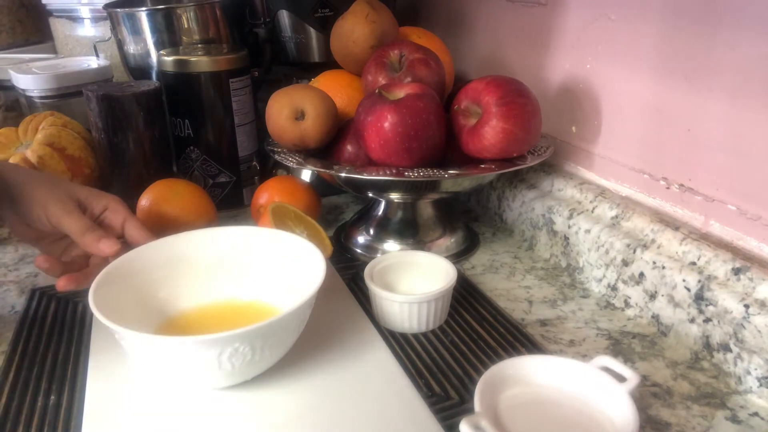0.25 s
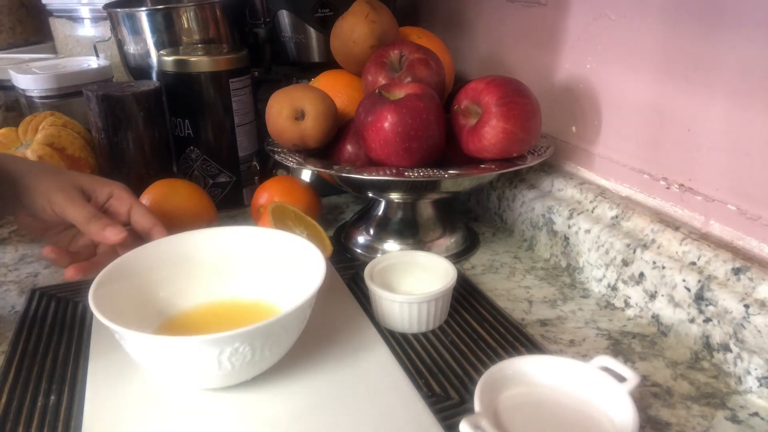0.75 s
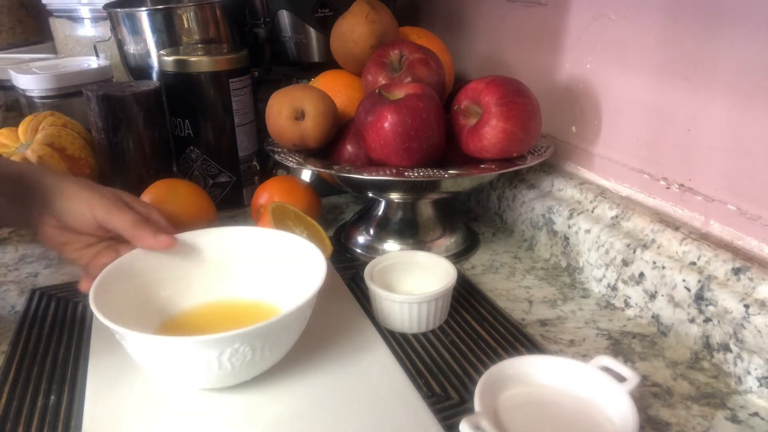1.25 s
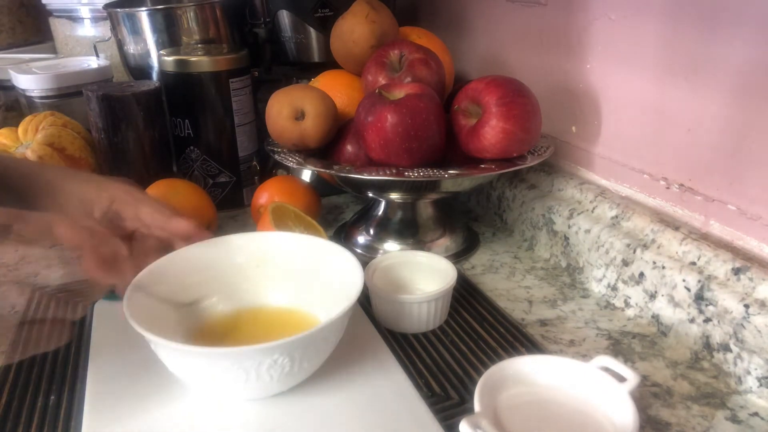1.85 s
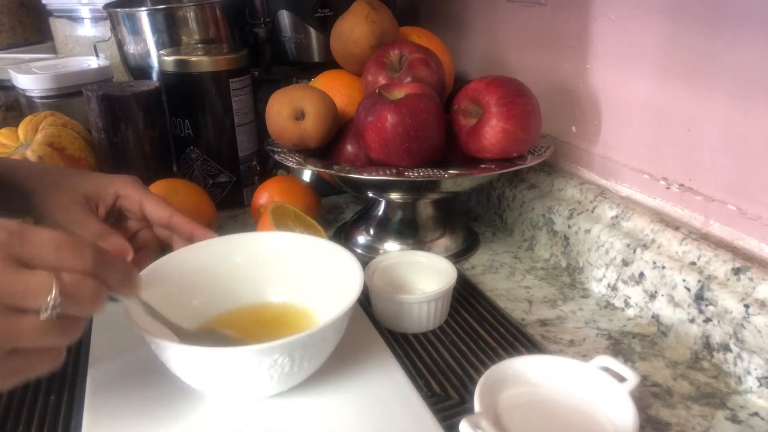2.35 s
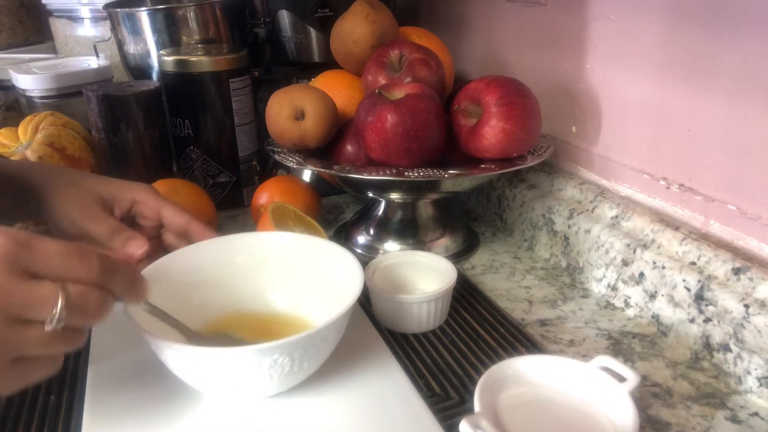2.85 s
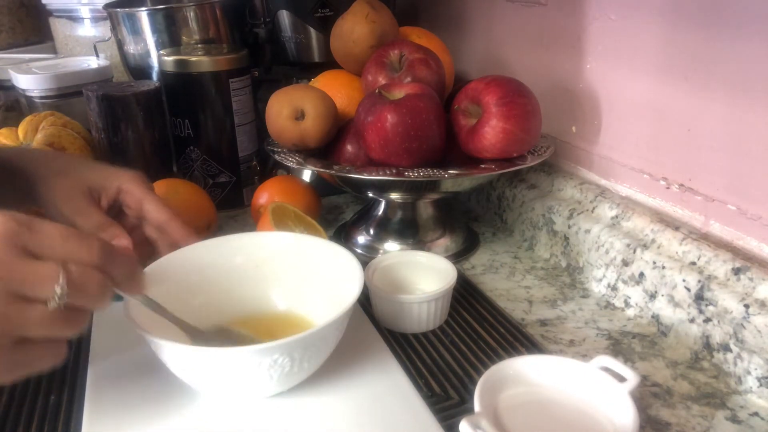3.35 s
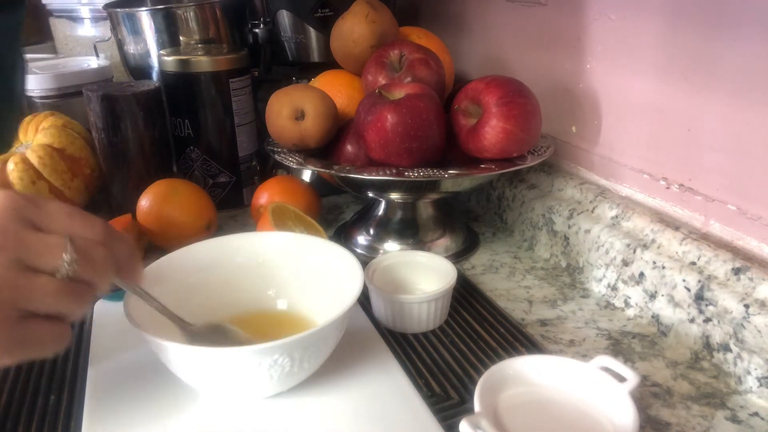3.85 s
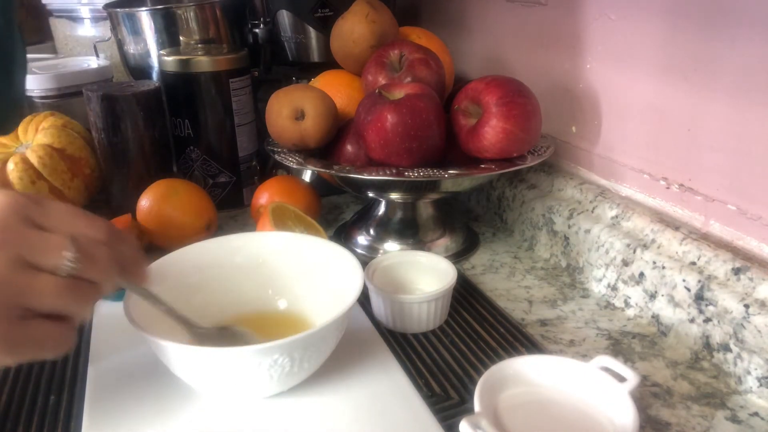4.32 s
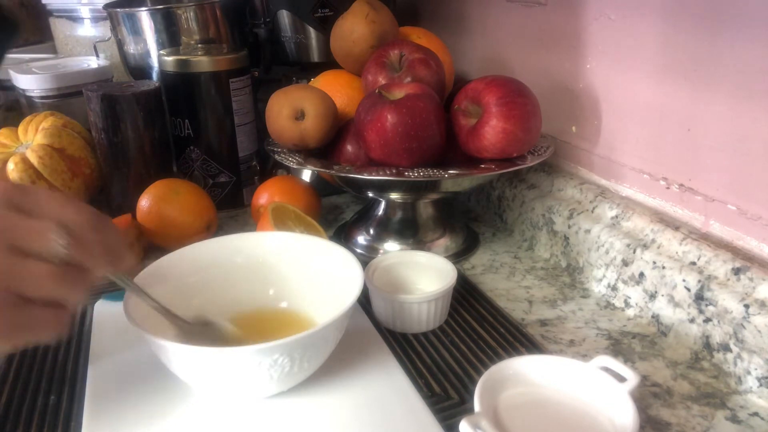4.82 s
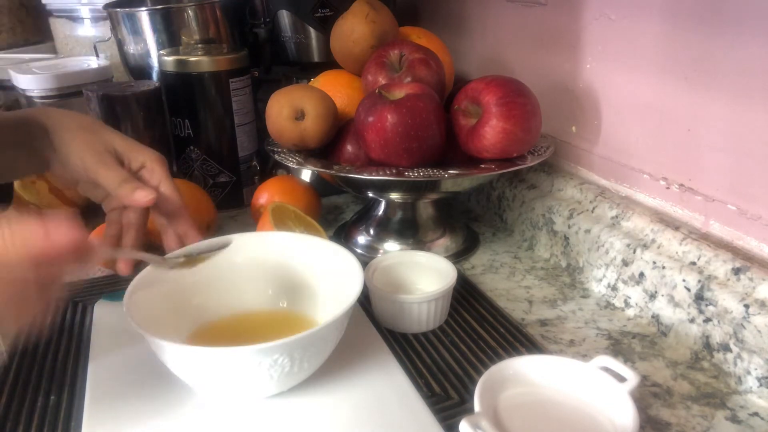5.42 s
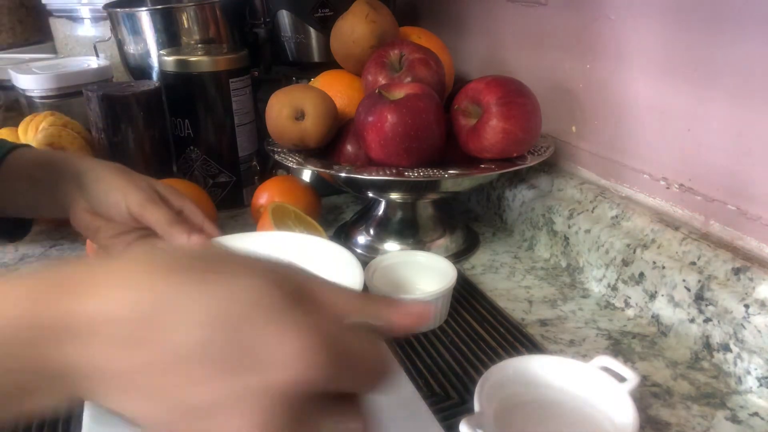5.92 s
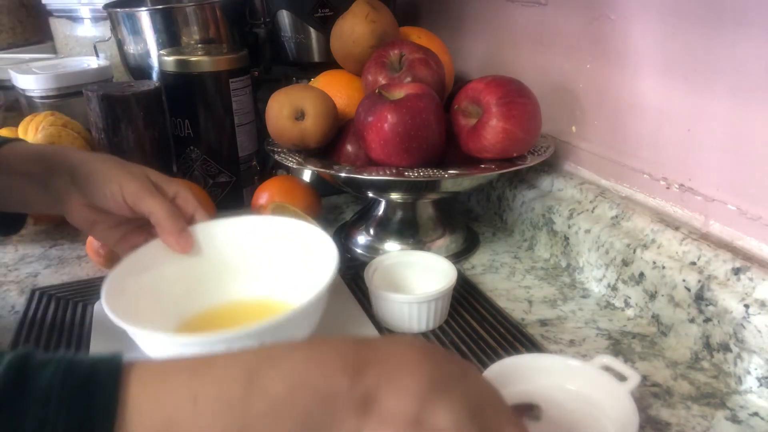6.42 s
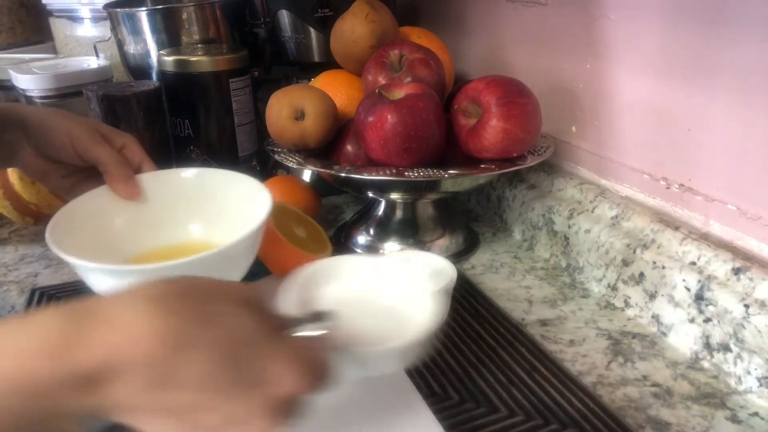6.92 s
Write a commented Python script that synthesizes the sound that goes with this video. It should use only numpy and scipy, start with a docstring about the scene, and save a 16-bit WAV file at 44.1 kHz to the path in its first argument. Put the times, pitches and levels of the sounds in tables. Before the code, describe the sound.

A cutlery drawer opens with a few knocks and shuts with a loud bang, farther back in a kitchen. Nearer the microphone and quieter, a ceramic bowl is pushed across a board, and a metal spoon lands in it with a ringing clink. Brisk stirring follows for about three seconds, the scrape rising and falling in pitch over softly swishing liquid. Light rubs and ticks of handled dishes end it, over faint room rumble and hiss.

```python
"""A kitchen counter, microphone close to the bowl. Farther off a drawer knocks open, rolls and bangs shut,
jolting the cutlery. A ceramic bowl is slid over a board. A steel spoon clinks into it and scrapes round
through a little juice, its resonances gliding as the contact moves. Then dishes are nudged and lifted
with soft rubs and small ticks. Under it all lie a low room rumble, hiss and a thin whine, which dip
as the stirring starts and creep back."""
import sys
import numpy as np
from scipy import signal
from scipy.fft import rfft, irfft, next_fast_len
from scipy.io import wavfile
from scipy.ndimage import map_coordinates

SR = 44100
rng = np.random.default_rng(int(sys.argv[2]) if len(sys.argv) > 2 else 0)


def master(y):
    """Save y as 16-bit WAV."""
    cut = np.clip(np.atleast_2d(y).T, -1, 1)
    pcm = np.round(cut * 32767)  # scale
    wavfile.write(sys.argv[1], SR, pcm.astype(np.int16))


N = 316197
TOP_HZ = 15900  # the microphone's band limit


def stirring():
    """Friction on the glaze drives the spoon's gliding modes and the bowl; each jerk plucks the spoon."""
    # Strokes along the wall. Each row: start and length in seconds, bending, second mode and rasp in dB.
    strokes = [(2.05, .13, -67, -72, -84), (2.32, 0.16, -63, -75, -81), (2.48, 0.12, -58.5, -74, -80),
               (2.65, 0.075, -66, -69, -79), (2.86, 0.098, -58.5, -80, -72.5), (2.99, 0.2, -56, -66, -84),
               (3.19, 0.11, -67, -72, -70), (3.36, 0.12, -57, -60.5, -69.5), (3.52, 0.083, -49, -59.5, -69),
               (3.68, 0.086, -59, -56, -68), (3.85, 0.12, -51.5, -56.5, -64),
               (3.98, 0.062, -51.5, -72, -97), (4.18, 0.1, -66, -58, -74), (4.36, 0.09, -54, -56, -67),
               (4.44, 0.088, -50, -70, -74.5), (4.605, 0.19, -49, -57, -69.5), (4.8, 0.011, -51, -56, -68)]
    # The edge catches and jerks free. Each row: start in seconds, bending and rasp in dB.
    catches = [(2.424, -59, -65), (3.002, -44.5, -76), (3.029, -47, -79), (3.107, -48, -62),
               (3.437, -52, -56), (3.477, -42.5, -76), (3.504, -40, -72), (3.529, -42, -74),
               (3.556, -40, -66), (3.577, -51, -57), (3.704, -40.5, -70), (3.903, -44, -68),
               (3.951, -37.5, -61), (4.059, -41, -82), (4.244, -42.5, -65), (4.364, -46, -57.5),
               (4.424, -37.5, -62), (4.452, -43, -76), (4.576, -41.5, -69), (4.607, -37, -71),
               (4.801, -37.5, -60)]
    # The second mode drifts with the grip. Each row: time in seconds, pitch in Hz.
    grip = [(2.15, 1710), (2.37, 1810), (2.55, 1680), (2.9, 1790), (3.15, 2030), (3.42, 1915), (3.58, 1720),
            (3.92, 1780), (4.28, 1775), (4.6, 1660)]
    attack_s, release_s, brisk_s = 0.022, 0.15, 2.33
    bending, second, rasping = played(strokes, attack_s, release_s)
    jerks, bites = played([(s, 0, *levels) for s, *levels in catches], attack_s=0.0015, release_s=0.068)
    # light contact between strokes, firmer as the stirring gets brisk
    drag = amp(-71 + 6 * (clock() - brisk_s)) * stroke(brisk_s, 2.47, attack_s, release_s)
    pressure = np.sqrt(bending ** 2 + (amp(-10) * jerks) ** 2 + drag ** 2)
    second_hz, = curves(grip)
    friction = grit(grain_db=1.5) * amp(1.2 * wobble(45))
    spoon = pressure * resonate(friction, bending_hz(), width_hz=282, order=4)
    spoon += np.hypot(second, amp(-11) * drag) * resonate(friction, second_hz, width_hz=460, order=4)
    plucks = jerks * sine(bending_hz() + 35 * wobble(120))
    return spoon + plucks + scraped_bowl(friction, pressure) + np.hypot(rasping, bites) * rasp()


def bending_hz():
    """The spoon's bending mode sinks and rises once a turn as the point of contact moves."""
    # The top of each turn, where the mode is highest. Each row: time in seconds, pitch in Hz.
    turns = [(2.2, 1256), (2.72, 1260), (3.62, 1331), (4.2, 1235), (4.68, 1191), (5.0, 1184)]
    low_hz = 1110
    turn, top_hz = curves([(s, k, hz) for k, (s, hz) in enumerate(turns)])
    return low_hz + (top_hz - low_hz) * np.cos(np.pi * turn) ** 2


def scraped_bowl(friction, pressure):
    """The bowl's broad modes follow the pressure; its narrow ones sing on after the scrape."""
    # Each row of both: pitch in Hz, width in Hz, relative level in dB.
    broad_modes = [(490, 55, -22), (727, 42, -13.5)]
    narrow_modes = [(1005, 2.2, -17), (2296, 13, -25)]
    drive = pressure * friction
    singing = np.std(drive) * resonances(drive, narrow_modes)
    return pressure * resonances(friction, broad_modes, order=2) + singing


def rasp():
    """Where the spoon's edge bites, it chatters into the high modes and crunches on the glaze."""
    # Each row: pitch in Hz, half width in Hz, relative level in dB.
    high_modes = [(3090, 170, 3.5), (3260, 55, 2.5), (3550, 20, -1), (4250, 42, 0.5), (5210, 180, 6.5),
                  (8790, 81, -2.5), (9950, 40, -8.5)]
    # Each row: frequency in Hz, spectral level in dB.
    crunch_colour = [(1500, 4), (2300, 4.5), (4000, -15), (8000, -10.5), (15000, -29)]
    chatter = grit(grain_db=3) * amp(2 * wobble(70))
    ringing = unit(resonances(chatter, [(hz, 2 * half, db) for hz, half, db in high_modes], order=2))
    return amp(-1) * ringing + amp(-1.5) * noise(crunch_colour, grain_db=3)


def squeals():
    """The chattering edge excites one high mode of the spoon, which glides in some squeals."""
    # Each row: peak time and half length in seconds, level in dB, pitch in Hz, glide in Hz per second.
    squeaks = [(2.452, 0.03, -74, 6050, 6000), (3.111, 0.0082, -60, 5210, 0),
               (3.434, 0.025, -62.5, 5580, 0), (3.54, 0.008, -65, 6090, 0),
               (3.719, 0.027, -64.5, 5680, 5000), (3.82, .04, -78, 6140, 0),
               (3.93, 0.032, -65, 5480, -4000), (4.24, 0.027, -64.5, 5800, 5000),
               (4.701, 0.039, -60.5, 5810, 0), (4.825, 0.015, -71, 6080, 0)]
    times, _, _, hz, glide = np.transpose(squeaks)
    nearest = np.searchsorted((times[1:] + times[:-1]) / 2, clock())
    pitch_hz = hz[nearest] + glide[nearest] * (clock() - times[nearest])
    slipping = unit(amp(4 * wobble(220)))
    squeal = slipping * resonate(grit(grain_db=6), pitch_hz, width_hz=160, order=2)
    return sum(amp(db) * swell(s, half) for s, half, db, _, _ in squeaks) * squeal


def juice():
    """The liquid swishes round and settles; a slap of the spoon gives a quickly falling plop."""
    # Each row: peak time and half length in seconds, level in dB.
    swirls = [(2.593, 0.32, -69.5), (3.125, 0.14, -67), (3.387, 0.055, -65.5), (3.992, 0.77, -71.5)]
    # Each row: frequency in Hz, spectral level in dB.
    swish_colour = [(300, -6), (2200, 1.5), (3200, -10.5), (6500, -9.5), (15000, -38)]
    # Each row: start in seconds, level in dB.
    slaps = [(2.303, -53.5), (3.445, -32)]
    out = sum(amp(db) * swell(s, half) for s, half, db in swirls) * noise(swish_colour, grain_db=1)
    t = clock()[:SR // 10]
    plop = sine(380 + 1100 * fade(t, t60=0.0063)) * np.exp(-(t / 0.0029) ** 2)
    for s, db in slaps:
        add(out, s, amp(db) * plop)
    return out


def clinks():
    """The spoon strikes the wall and both ring freely; as it lands, the board gives a soft thud."""
    # Each row: start in seconds, level in dB.
    strikes = [(1.879, -49.5), (2.497, -72.5), (4.804, -63)]
    # Bowl and spoon together. Each row: pitch in Hz, relative level in dB, t60 in seconds.
    free_modes = [(738, -6.5, 0.14), (1027, -8, 1.95), (2333, -8.5, 0.21), (4130, -18, 0.3),
                  (5300, -5, 0.08), (5776, -6.5, 0.14), (8500, -7, 0.12)]
    contact_colour = [(300, -7), (1300, 18), (3000, 2.5), (8500, 1), (12000, -23)]
    out, t = np.zeros(N), clock()[:SR]
    for s, db in strikes:
        contact = noise(contact_colour)[:SR] * fade(t, t60=0.06)
        add(out, s, amp(db) * (ring(free_modes, t) + 2.07 * contact))
    thud = ring([(58, -47.5, 0.28), (138, -47, 0.12)], t)
    add(out, 1.98, thud)
    return out


def landing():
    """The spoon clatters on the bottom of the bowl, damped by the juice."""
    # Each row: start in seconds, level in dB.
    contacts = [(1.961, -46), (1.964, -42.5), (1.9716, -42.5)]
    # Each row: frequency in Hz, spectral level in dB.
    clatter_colour = [(120, -35), (200, -5.5), (550, 1.5), (671, -30), (849, -3.5), (2210, -6.5),
                      (3800, -22.5), (5550, -17), (15000, -38)]
    out, t, clatter = np.zeros(N), clock()[:SR // 10], noise(clatter_colour)
    for s, db in contacts:
        add(out, s, amp(db) * burst(clatter, s, t, t60=0.037))
    return out


def drawer():
    """Each blow cracks at the catch, rings front and box and swells in the cabinet; shutting shakes
    the frame hardest."""
    # Each row: start in seconds, then cabinet, front, frame, box, clack and crack in dB.
    blows = [(.403, -27, -29, -49, -53, -45.5, -31.5), (0.43, -46, -36, -71, -52, -52, -37.5),
             (.441, -29.5, -35, -50, -48, -53, -36.5), (0.9388, -30, -36.5, -27.5, -50.5, -18.5, -27.5),
             (1.0211, -21, -22, -19, -30.5, -46, -38.5)]
    # Cabinet, drawer front, the frame that stops it, hollow box and steel catch.
    # Each row: pitch in Hz, relative level in dB, t60 in seconds.
    cabinet_modes = [(128.4, -8.5, .32), (154.7, -2, 0.18)]
    front_modes = [(356, -3, 0.033), (555, -3.5, 0.042), (578, 0.5, 0.06), (837, -4, 0.085),
                   (1660, -7, 0.06), (1726, -7.5, 0.044), (2380, -20.5, 0.16)]
    frame_modes = [(245, -2.5, 0.12), (293, -11, 0.069), (445, -3, 0.057), (1003, -1.5, 0.036),
                   (1126, -2.5, 0.026), (1285, -3.5, 0.022), (1800, -9, 0.045)]
    box_modes = [(368, -5, .09), (523, -1.5, 0.1), (561, -3.5, 0.089), (609, 2, 0.16)]
    latch_modes = [(1655, -10.5, 0.056), (2890, -13, 0.049), (3550, -17, 0.037), (4000, -14, 0.037),
                   (5950, -13.5, .04)]
    # Noise of the catch and of the cutlery. Each row: frequency in Hz, spectral level in dB.
    clack_colour = [(300, -26.5), (800, -14.5), (1200, 1), (2200, 2), (5900, -8.5), (7000, -23),
                    (15000, -43)]
    crack_colour = [(500, -24.5), (2500, 1), (3300, -23), (4200, -1), (5300, -9.5), (7900, 3), (11000, -11),
                    (16000, -15.5)]
    out, t = np.zeros(N), clock()[:SR // 2]
    clack, crack = noise(clack_colour), noise(crack_colour)
    wood = noise([(150, -17), (500, 9.5), (1400, 4.5), (2500, -8.5), (6000, -31)])
    # the longer a cabinet mode rings, the more slowly it builds up
    thump = sum(amp(db + 4.5) * fade(t, t60) * (1 - fade(t, t60 / 2)) * np.sin(2 * np.pi * hz * t)
                for hz, db, t60 in cabinet_modes)
    rise = 1 - fade(t, t60=0.004)
    for s, cabinet_db, front_db, frame_db, box_db, clack_db, crack_db in blows:
        frame = amp(frame_db) * (ring(frame_modes, t) + amp(-15.5) * burst(wood, s, t, t60=0.25))
        front = amp(front_db) * ring(front_modes, t)
        box = amp(box_db) * ring(box_modes, t)
        add(out, s, amp(cabinet_db) * thump + rise * (front + frame + box))
        latch = amp(-0.5) * burst(clack, s, t, t60=0.028) + ring(latch_modes, t)
        add(out, s, amp(clack_db) * latch + amp(crack_db) * burst(crack, s, t, t60=0.024))
    low_cut = signal.butter(2, 100, "high", fs=SR, output="sos")  # keeps the knocks free of deep bass
    return signal.sosfilt(low_cut, out + cutlery(crack, t))


def cutlery(crack, t):
    """Jolted cutlery bounces in the drawer, each hop shorter and weaker until it rests."""
    # Each row: start in seconds, strength in dB.
    jolts = [(0.453, -34), (1.023, -20), (1.098, -41)]
    first_hop_s, shrink, loss_db, rest_db = 0.01, 0.93, 5, -43
    out = np.zeros(N)
    for s, db in jolts:
        for bounce in range(6):
            at = s + first_hop_s * sum(shrink ** np.arange(bounce))
            left_db = db - loss_db * bounce
            if bounce == 0 or left_db > rest_db:
                add(out, at, amp(left_db - 6.5) * burst(crack, at, t, t60=0.012))
    return out


def runners():
    """The drawer rolls with a gritty hiss on its ringing rails."""
    # Each row: start and length in seconds, rails and hiss in dB.
    pushes = [(.46, 0.14, -57, -65.5), (.625, 0.052, -59, -60.5), (.76, 0.33, -69.5, -77)]
    # Each row: pitch in Hz, width in Hz, relative level in dB.
    rail_modes = [(720, 24, 0), (1708, 45, -3), (2630, 180, -6.5), (4000, 200, -9.5)]
    rail_gain, hiss_gain = played(pushes, attack_s=0.03, release_s=0.35)
    rails = unit(resonances(grit(grain_db=3.5), rail_modes))
    hiss = noise([(2500, -3.5), (4200, 2), (6000, 6.5), (9500, -1), (15000, -15.5)], grain_db=3)
    return rail_gain * rails + hiss_gain * hiss


def slide():
    """Pushed once, the bowl's unglazed foot grinds over the board, catches and slows to a stop."""
    # Each row: frequency in Hz, spectral level in dB.
    board_colour = [(60, -13), (130, 1), (480, -2), (650, -11), (1050, 1.5), (1450, -4.5), (2900, -21.5),
                    (4900, -25), (15000, -57)]
    start_s, attack_s, push_s, slowing_s = 1.302, 0.029, 0.2, 0.26
    t = clock() - start_s
    speed = np.clip(t / attack_s, 0, 1) * np.clip(1 - (t - push_s) / slowing_s, 0, 1)
    catches = sum(swell(s, half=0.0021) for s in (1.381, 1.419, 1.435, 1.476))
    return speed * amp(-47.5 + 6.6 * catches) * noise(board_colour, grain_db=1.5)


def rubs():
    """Dry friction of spoon, hand and dishes: a soft body, hiss and the dish resonances it stirs."""
    # Each row: peak time and half length in seconds, body and treble in dB.
    touches = [(5.22, 0.021, -59, -97), (5.717, 0.13, -74.5, -74), (6.195, 0.03, -69, -69),
               (6.265, 0.022, -54, -74), (6.338, 0.011, -54, -66), (6.415, 0.016, -60, -63),
               (6.569, 0.019, -70, -62), (6.584, 0.006, -68, -52), (6.597, 0.0053, -59, -56.5)]
    # Each row of both: frequency in Hz, spectral level in dB.
    body_colour = [(60, -5), (200, 7), (600, -5), (1400, -7.5), (2300, -23.5), (4000, -52.5)]
    hiss_colour = [(800, -1), (2300, -3.5), (4800, 0), (6500, -8), (7600, -10.5), (10000, -22),
                   (15000, -28.5)]
    # Each row: pitch in Hz, width in Hz, relative level in dB.
    rubbed_modes = [(2495, 100, -2.5), (3580, 200, -11.5), (4550, 280, 2), (5340, 260, 0), (5920, 120, -9),
                    (7400, 270, -1)]
    body = noise(body_colour)
    ringing = unit(resonances(grit(grain_db=2.5), rubbed_modes, order=2))
    treble = amp(-1) * noise(hiss_colour, grain_db=1.5) + amp(-4.5) * ringing
    return sum(swell(s, half) * (amp(body_db) * body + amp(treble_db) * treble)
               for s, half, body_db, treble_db in touches)


def ticks():
    """Spoon and dishes touch with dry ticks; a small dish is tapped and rocks."""
    # Each row: start in seconds, level in dB, band frequency in Hz, t60 in seconds.
    contacts = [(5.449, -54, 4330, 0.028), (5.897, -60.5, 2500, 0.028), (6.0189, -50, 2420, 0.023),
                (6.913, -57.5, 3020, 0.057), (6.941, -57, 11160, 0.041), (7.091, -58.5, 7600, 0.03)]
    # Each row: start in seconds, level in dB.
    taps = [(6.019, -52), (6.036, -58)]
    # Each row: pitch in Hz, relative level in dB, t60 in seconds.
    dish_modes = [(930, 0, 0.061), (1253, 4, 0.048), (1400, 3, 0.04), (2100, 4.5, 0.022), (3630, -9, 0.026)]
    out, t = np.zeros(N), clock()[:SR // 8]
    for s, db, hz, t60 in contacts:
        band = signal.butter(2, [hz / 2, min(hz * 1.4, TOP_HZ)], "band", fs=SR)
        tick = unit(signal.lfilter(*band, rng.standard_normal(len(t))))
        add(out, s, amp(db) * tick * fade(t, t60))
    for s, db in taps:
        add(out, s, amp(db) * ring(dish_modes, t))
    return out


def kitchen(x):
    """The room answers with a short diffuse tail, dying sooner in the treble."""
    # Each row: frequency in Hz, t60 in seconds.
    decay_times = [(150, 0.33), (3000, 0.22), (12000, 0.13)]
    hz, t, spectra = signal.stft(rng.standard_normal(SR // 2), SR, nperseg=256)
    _, tail = signal.istft(spectra * fade(t, along(decay_times, hz)[:, None]), SR, nperseg=256)
    response = np.pad(tail, (SR // 200, 0)) / np.linalg.norm(tail)  # arrives 5 ms late
    return signal.fftconvolve(x, response)[:N]


def background():
    """Appliance rumble, hiss and a thin fuzzy whine; all sink as the stirring starts and creep back."""
    # Each row of both: frequency in Hz, spectral level in dB.
    rumble_colour = [(20, -47), (40, -10.5), (80, -4.5), (113, 4.5), (140, -8), (170, -5), (210, -14),
                     (450, -18.5), (1000, -28), (2500, -53.5)]
    hiss_colour = [(100, 12.5), (1200, 6.5), (3000, -2), (8000, -1), (10000, -7), (15500, -11)]
    whine_hz, dip_db = 8697, -14.5
    lull = amp(dip_db * stroke(1.7, length=1.07, attack_s=0.56, release_s=4.9))
    whine = amp(-76.42) * sine(whine_hz + 18 * wobble(60))
    fuzz = amp(-81.92) * resonate(grit(grain_db=0), whine_hz, width_hz=400, order=2)
    return lull * (amp(-58.92) * noise(rumble_colour) + amp(-70.92) * noise(hiss_colour) + whine + fuzz)


def amp(db):
    """Decibels to gain."""
    return 10 ** (np.asarray(db) / 20)


def unit(x):
    """Scale to rms 1."""
    return x / np.sqrt(np.mean(x ** 2) + 1e-20)


def clock():
    """The time of every sample in seconds."""
    return np.arange(N) / SR


def sine(hz):
    """A tone that follows a moving pitch."""
    return np.sin(2 * np.pi * np.cumsum(hz) / SR)


def along(points, hz):
    """Points of (Hz, value) read on a log frequency axis."""
    knots_hz, values = np.transpose(points)
    return np.interp(np.log(hz + 1), np.log(knots_hz), values)


def curves(rows):
    """One value per sample for each column after the time."""
    times, *columns = np.transpose(rows)
    return [np.interp(clock(), times, column) for column in columns]


def wobble(rate):
    """A smooth random curve, rate knots a second."""
    return unit(map_coordinates(rng.standard_normal(int(N * rate / SR) + 4), [clock() * rate]))


def filtered(x, gain):
    """x times a gain that depends on frequency."""
    size = next_fast_len(N + 8192)
    return irfft(rfft(x, size) * gain(np.fft.rfftfreq(size, 1 / SR)), size)[:N]


def noise(colour, grain_db=0):
    """Noise of rms 1, shaped by points of (Hz, dB); grain makes it gritty."""
    return unit(filtered(grit(grain_db), lambda hz: amp(along(colour, hz))))


def grit(grain_db):
    """White noise that catches and slips every few milliseconds; smooth at zero grain."""
    return unit(rng.standard_normal(N) * amp(grain_db * wobble(400)))


def resonate(x, hz, width_hz, order=1):
    """x through a resonance whose pitch may move, at rms 1."""
    centre_hz = np.mean(hz)
    drift = np.exp(2j * np.pi * np.cumsum(hz - centre_hz) / SR)
    pole = np.exp(np.pi * (2j * centre_hz - width_hz) / SR)
    ringing = x / drift
    for _ in range(order):
        ringing = signal.lfilter([1], [1, -pole], ringing)
    return unit((ringing * drift).real)


def resonances(x, modes, order=1):
    """x drives several resonances side by side."""
    return sum(amp(db) * resonate(x, hz, width, order) for hz, width, db in modes)


def ring(modes, t):
    """Damped modes of (Hz, dB, t60), at slightly new strengths and random phases for each blow."""
    return sum(amp(db + 2 * rng.normal()) * fade(t, t60) * np.sin(2 * np.pi * (hz * t + rng.random()))
               for hz, db, t60 in modes)


def fade(t, t60):
    """Exponential decay, down 60 dB after t60 seconds."""
    return np.exp(-np.log(1000) * t / t60)


def burst(x, s, t, t60):
    """A decaying piece of x, taken from time s."""
    return x[round(s * SR):][:len(t)] * fade(t, t60)


def swell(s, half):
    """A smooth rise and fall around time s."""
    return np.exp(-0.5 * ((clock() - s) / half) ** 2)


def stroke(s, length, attack_s, release_s):
    """A movement that sets in at s, holds and dies away."""
    t = clock() - s
    return np.clip(t / attack_s, 0, 1) * fade(np.maximum(t - length, 0), release_s)


def played(rows, attack_s, release_s):
    """Rows of (start, length, dB, ..) as strokes: one gain curve for each dB column."""
    return sum(amp(levels)[:, None] * stroke(s, length, attack_s, release_s)
               for s, length, *levels in rows)


def add(track, s, sound):
    """Mix a sound in at time s."""
    part = track[round(s * SR):][:len(sound)]
    part += sound[:len(part)]


def scene():
    """The drawer is farther from the microphone and carries more of the room than the bowl does."""
    far = drawer() + runners()
    near = slide() + stirring() + squeals() + juice() + clinks() + landing() + rubs() + ticks()
    room = kitchen(amp(-13) * far + amp(-16.5) * near)
    return (far + near + room + background())[None]


def record(dry):
    """One microphone, which keeps nothing above its band limit."""
    return filtered(dry[0], lambda hz: hz < TOP_HZ)[None]


dry = scene()
out = record(dry)
master(out)
```